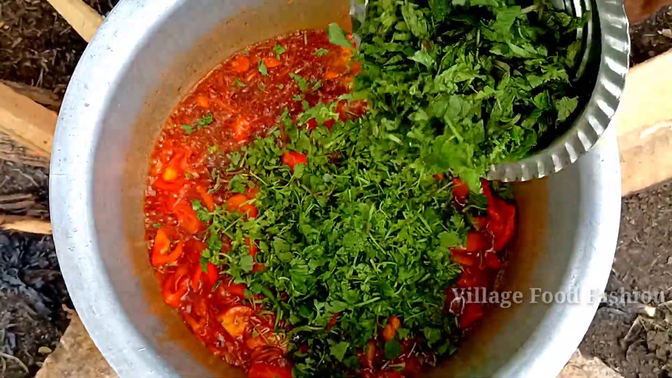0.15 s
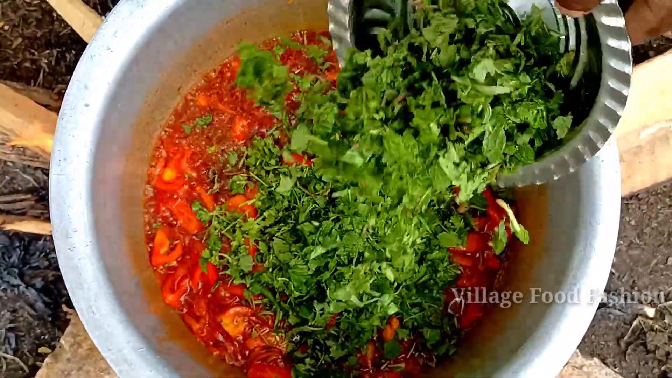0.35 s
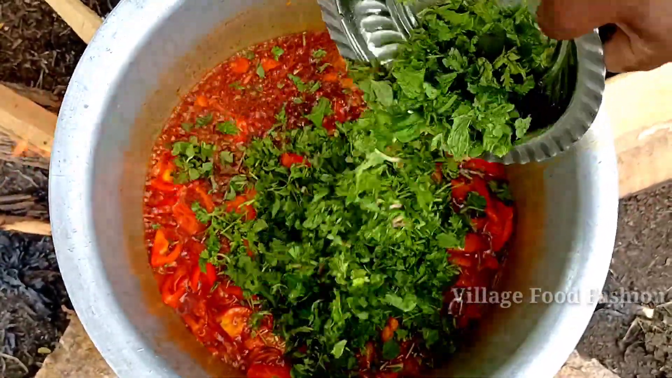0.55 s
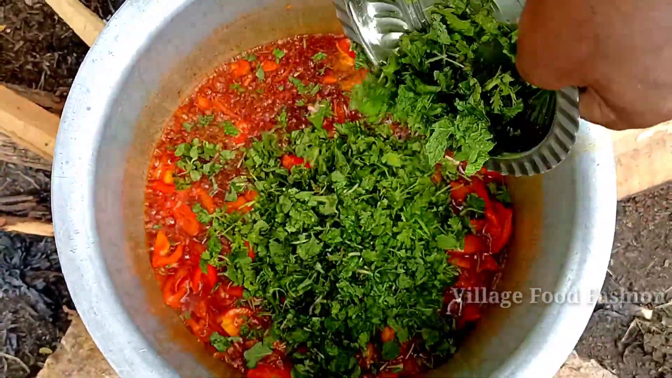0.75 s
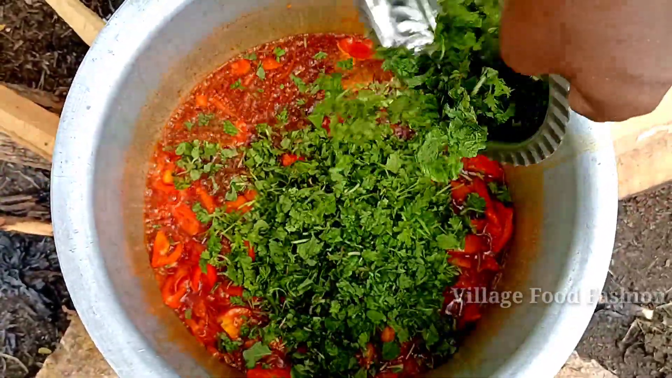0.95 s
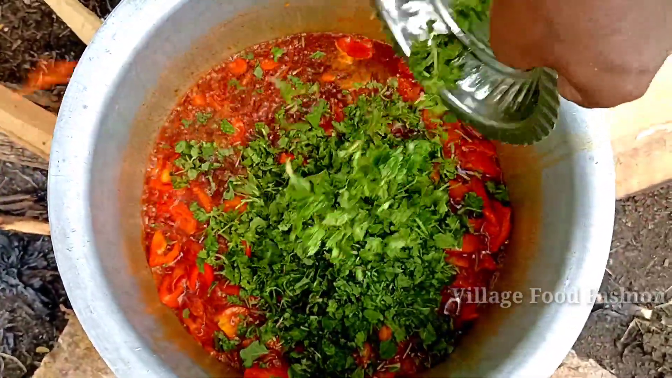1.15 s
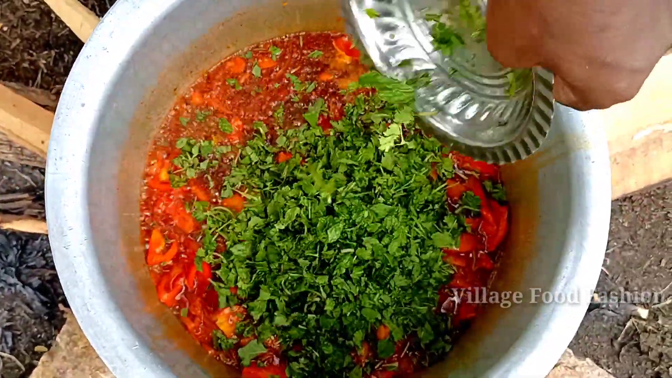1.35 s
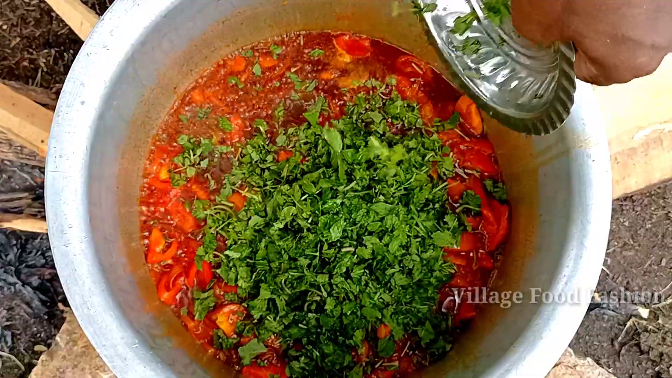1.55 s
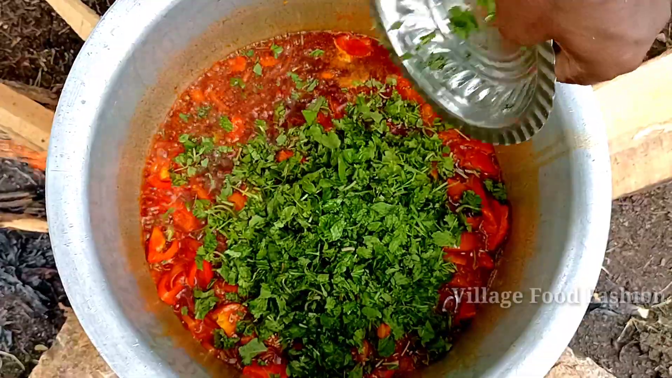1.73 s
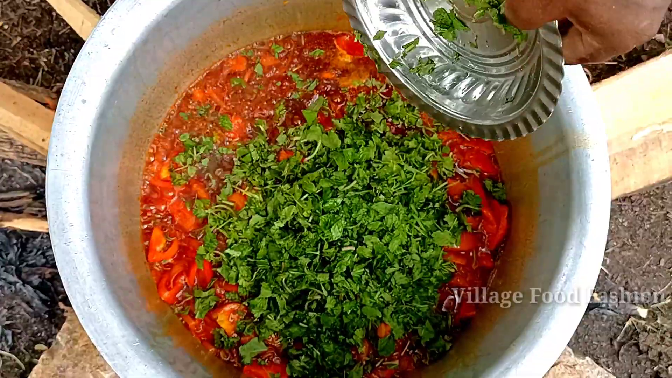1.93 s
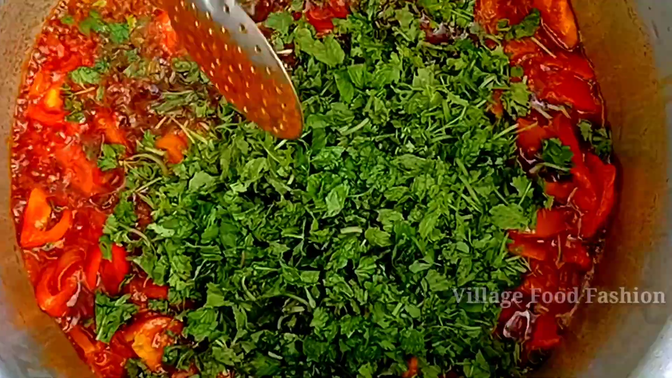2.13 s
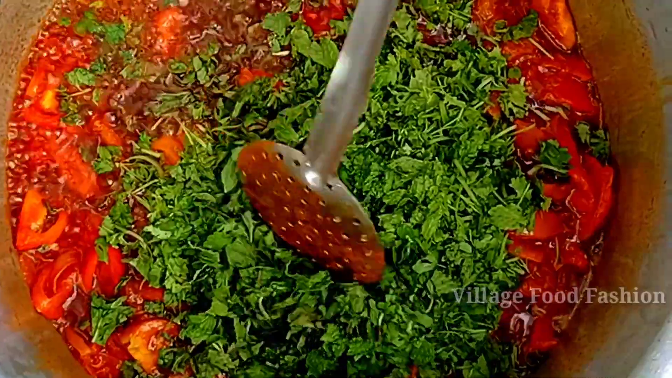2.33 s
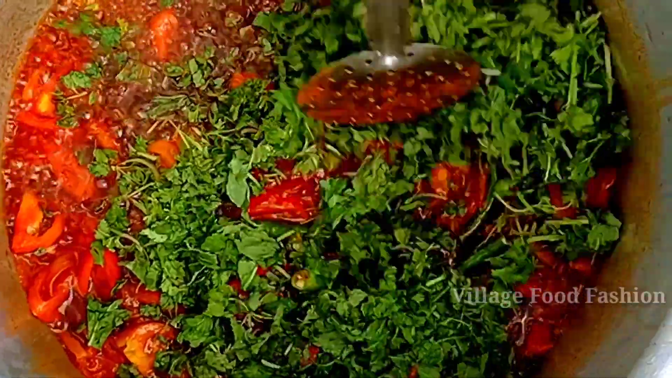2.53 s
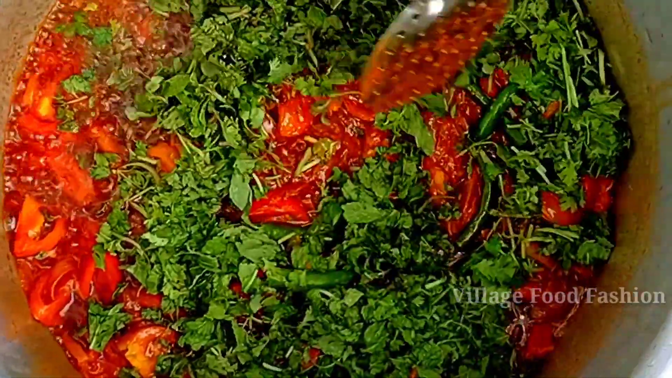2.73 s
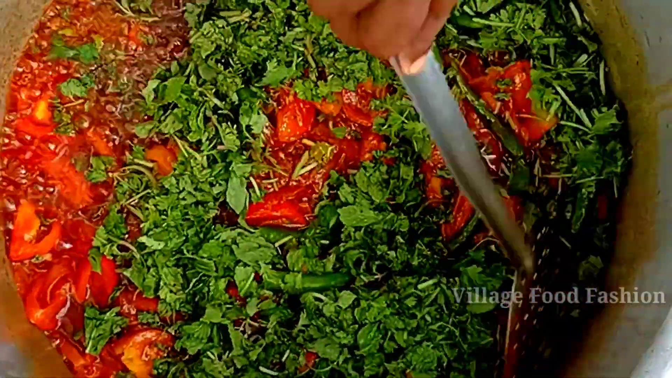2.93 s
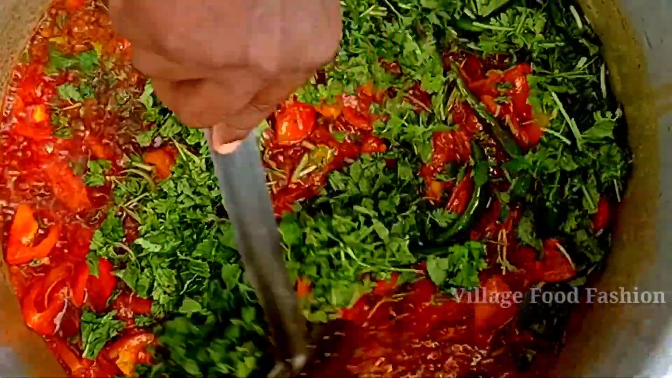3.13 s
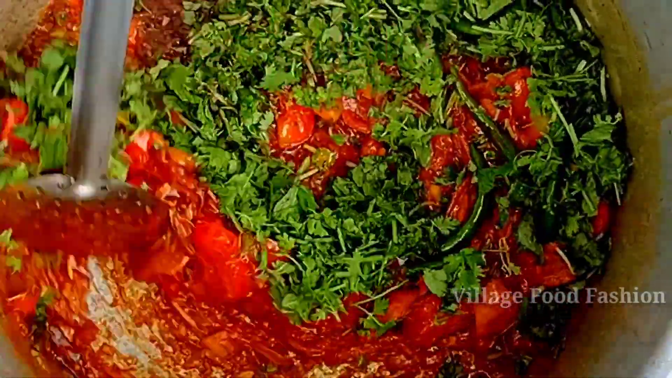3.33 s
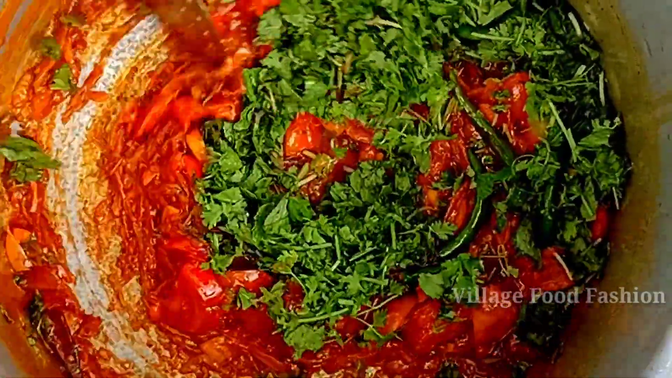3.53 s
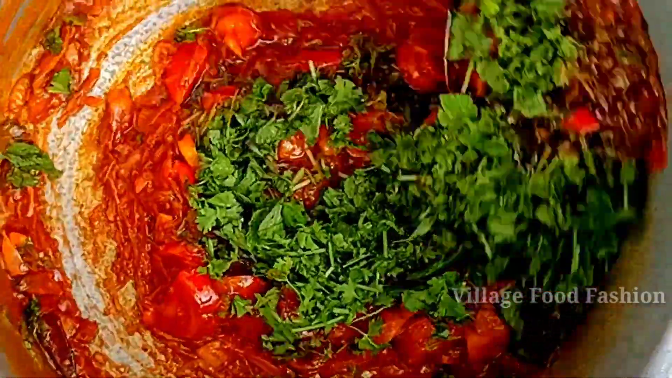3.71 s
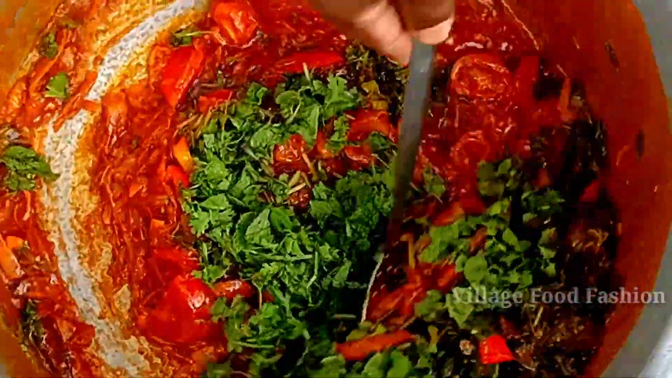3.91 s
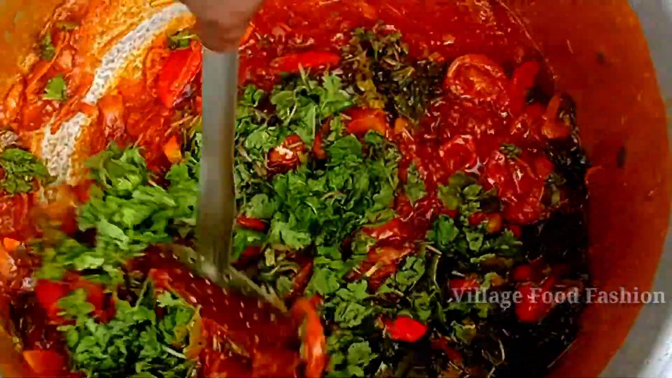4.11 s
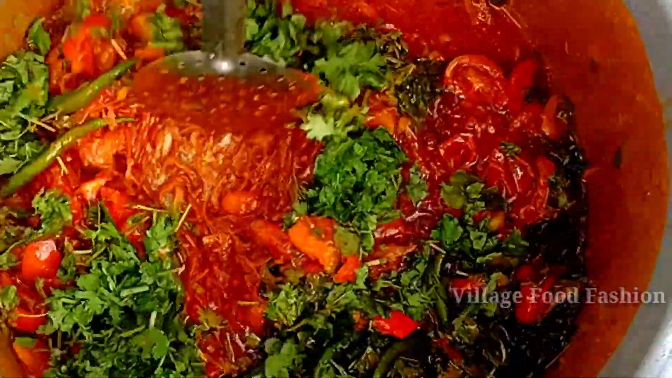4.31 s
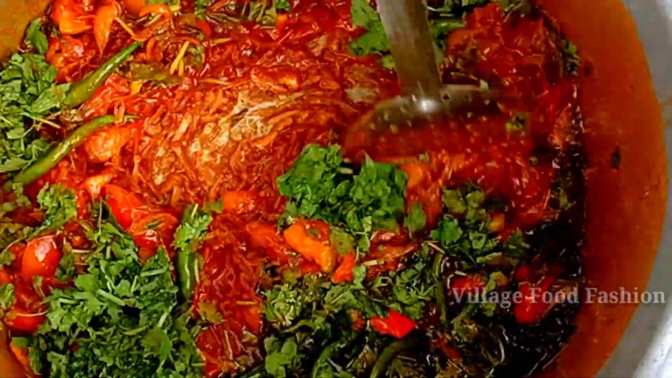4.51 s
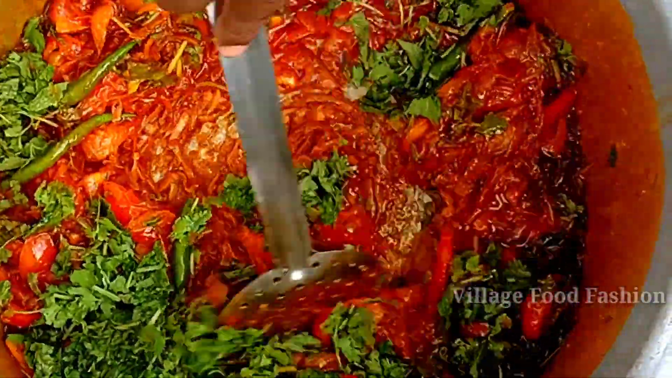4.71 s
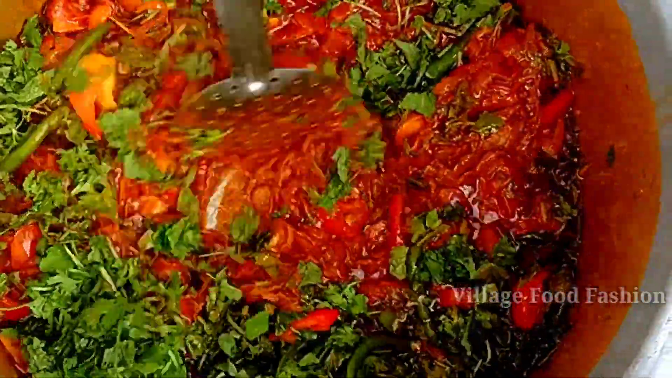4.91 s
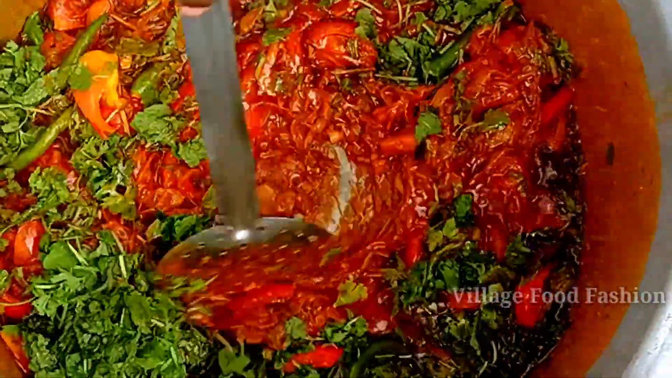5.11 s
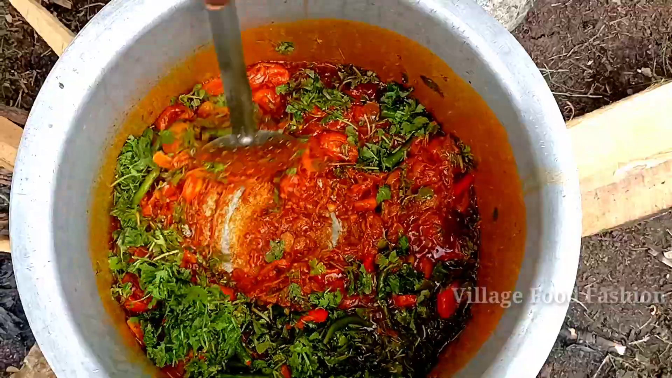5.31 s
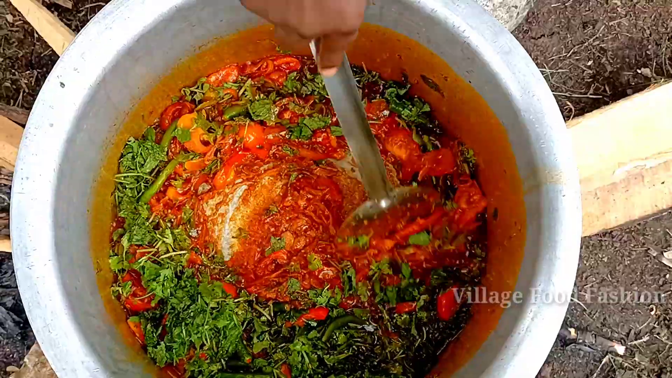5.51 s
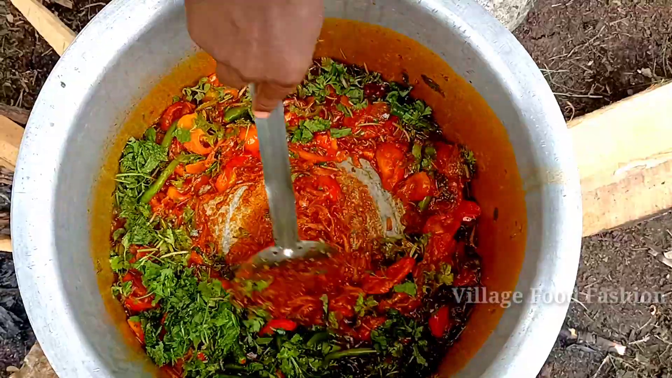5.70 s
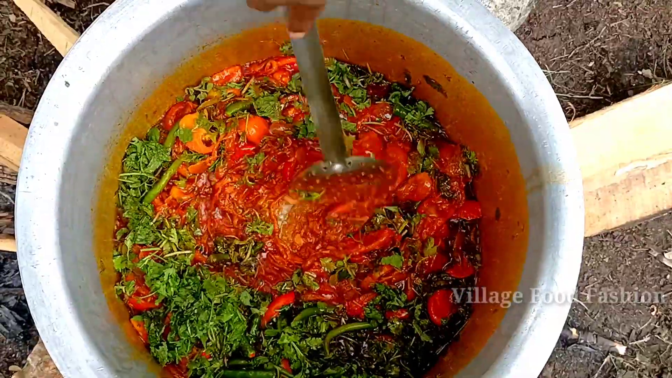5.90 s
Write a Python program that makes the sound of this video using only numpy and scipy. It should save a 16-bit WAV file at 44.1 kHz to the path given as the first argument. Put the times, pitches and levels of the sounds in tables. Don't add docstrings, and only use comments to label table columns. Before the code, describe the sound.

Close stereo from above a large metal pot outdoors. At 0.0 s a short hard knock with a double click and low thump, under a brief gust. Until 3 s a quiet simmer continues: fine uneven crackle, separate bright oil spits, tiny high ticks, faint low air rumble; around 2.2-2.7 s the bubbling livens with a few soft, lower plops. Another gust swells near 3 s. At 3.09 s the ladle strikes the wall with a bright clang, bouncing rapidly and dying quickly. Short scrapes follow, and from 3.4 s the frying opens into a dense hiss, strongest around 3.6 s, easing by 4.3 s while the blade mostly rests. From 4.4 s gritty, ringing scrapes return in quick strokes, with sharp metallic snags and soft hollow booms of falling masala near 4.66, 4.97 and 5.5 s. The sizzle dips near 5.2 s, then rises again; the scraping is loudest from 5.3 s and continues to the end.

```python
import sys
import numpy as np
from scipy import signal
from scipy.fft import rfft, irfft, next_fast_len
from scipy.io import wavfile
from scipy.ndimage import uniform_filter1d, map_coordinates

SR = 44100
rng = np.random.default_rng(int(sys.argv[2]) if len(sys.argv) > 2 else 0)


def gain_from_decibels(decibels):
    exponent = np.asarray(decibels, float) / 20
    return 10 ** exponent


def wav_record(signal):
    frames = np.transpose(np.atleast_2d(signal))
    bounded = np.clip(frames, -1, 1)
    quanta = np.round(bounded * 32767).astype(np.int16)
    wavfile.write(sys.argv[1], SR, quanta)


N = 262395


def unit(x):
    return x / np.sqrt(np.mean(x ** 2) + 1e-20)


def along(points, hz):
    f, v = np.transpose(points)
    return np.interp(np.log(hz + 1), np.log(f + 1), v)


def level_curve(rows, before_db=-120):
    s, db = np.transpose(rows)
    return np.interp(np.arange(N) / SR, s, db, left=before_db)


def wobble(rate):
    knots = rng.standard_normal(int(N * rate / SR) + 4)
    return map_coordinates(knots, [np.arange(N) * rate / SR])


def filtered(x, response):
    m = next_fast_len(N + SR // 2)
    return irfft(rfft(x, m) * response(np.fft.rfftfreq(m, 1 / SR)), m)[..., :N]


def toned(x, tone):
    return unit(filtered(x, lambda hz: gain_from_decibels(along(tone, hz))))


def bursts(rate, spread_db, life, share):
    sizes = np.minimum(rng.exponential(1, N), 3)
    starts = (rng.random(N) < rate / SR) * gain_from_decibels(spread_db * sizes)
    t = np.arange(SR // 20) / SR
    shape = signal.fftconvolve(starts, np.exp(-t / life))[:N]
    share = np.clip(share, 0, 1)
    envelope = np.sqrt(1 - share) + np.sqrt(share) * unit(shape)
    return envelope * rng.standard_normal((2, N))


def pressed(s, held, db, rise, fall):
    t = np.arange(0, N + 64, 64) / SR
    s, held, db = s[:, None], np.abs(held)[:, None], db[:, None]
    before = np.maximum(s - t, 0)
    after = np.maximum(t - s - held, 0)
    return gain_from_decibels(db - rise * before - fall * after)


def contact(s, held, db):
    return pressed(s, held, db, rise=598, fall=302)


def summed(gains, weight=1):
    total = np.sqrt(np.sum((gains * np.reshape(weight, (-1, 1))) ** 2, axis=0))
    return np.interp(np.arange(N) / 64, np.arange(len(total)), total)


def add(track, s, sound):
    part = track[:, round(s * SR):][:, :sound.shape[1]]
    part += sound[:, :part.shape[1]]


def ring(hz, t60, attack, length):
    t = np.arange(int(length * SR)) / SR
    phase = [[0], [rng.uniform(0, 2 * np.pi)]]
    return gain_from_decibels(-60 * t / t60) * (1 - np.exp(-t / attack)) * np.sin(2 * np.pi * hz * t + phase)


def puff(hz, t60):
    t = np.arange(SR // 25) / SR
    b, a = signal.butter(2, [0.72 * hz, min(1.4 * hz, 0.45 * SR)], "band", fs=SR)
    return gain_from_decibels(-60 * t / t60) * unit(signal.lfilter(b, a, rng.standard_normal((2, len(t)))))


def bubble(hz):
    life = 0.0063 + 14 / hz
    tone = 1.12 * ring(hz, life, 0.00021, 0.04)
    spray = 0.6 * puff(hz, 0.84 * life)
    snap = 0.23 * puff(min(1.5 * hz, 7500), 0.0034)
    return tone + spray + snap


def patchy(pair, patchy_db):
    z = signal.stft(pair, nperseg=512)[2]
    field = uniform_filter1d(rng.standard_normal(z.shape[1:]), size=6, axis=0)
    field = uniform_filter1d(field, size=8, axis=1)
    return signal.istft(z * gain_from_decibels(patchy_db * unit(field)), nperseg=512)[1][:, :N]


# (frequency [Hz], density [dB per Hz])
FIZZ_COLOUR = [(9500, -22.5), (11000, -15), (12500, -8), (14200, 1), (15300, -6)]


def oil(level, fizz_db, tone, crackle, fizz, patchy_db):
    body = toned(patchy(crackle, patchy_db), tone)
    top = toned(fizz, FIZZ_COLOUR)
    return gain_from_decibels(2.5) * level * body + gain_from_decibels(fizz_db + 4.5) * top


# (time [s], level [dB])
SIMMER_LEVEL = [
    (0.06, -36.5),
    (0.69, -37),
    (1.69, -36.5),
    (2.24, -39),
    (2.47, -35.5),
    (3.07, -36),
]
# (frequency [Hz], density [dB per Hz])
SIMMER_COLOUR = [(90, -48), (170, -11.5), (295, 3), (450, -16), (680, -9), (990, -7), (1900, -11.5),
                 (2500, -2.5), (3500, -4.5), (5700, -7.5), (8300, -7.5), (9300, -17.5), (10500, -27.5),
                 (13000, -45)]


def simmer():
    calm_db = level_curve(SIMMER_LEVEL, before_db=None)
    crackle = bursts(400, 3.6, 0.002, 0.25)
    fizz = bursts(200, 4.1, 0.00099, 0.27)
    swell = gain_from_decibels(0.26 * wobble(6.76))
    return swell * oil(gain_from_decibels(calm_db + 1.43), calm_db - 7.5, SIMMER_COLOUR, crackle, fizz, patchy_db=2)


# (time [s], level [dB])
GUST_LEVEL = [
    (0.01, -38),
    (1.95, -51),
    (2.42, -49),
    (2.98, -40),
    (3.31, -41.5),
    (5.05, -50.5),
    (5.4, -44),
    (5.78, -45),
]
# (frequency [Hz], density [dB per Hz])
RUMBLE_COLOUR = [(8.8, -40), (15, 9), (70, 3), (107, 0), (220, -6), (290, -37), (480, -120)]


def breeze():
    steady_db, slope = -48, 94
    s, db = np.transpose(GUST_LEVEL)
    gusts = summed(pressed(s, 0 * s, db, slope, slope))
    lumps = np.hypot(gain_from_decibels(steady_db), gusts) * gain_from_decibels(1.0 + 1.1 * wobble(5.71))
    return lumps * toned(rng.standard_normal((2, N)), RUMBLE_COLOUR)


# (time [s], peak level [dB], pitch [Hz], t60 [s])
KNOCKS = [
    (.0247, -1, 278, .04),
    (1.3725, -21, 230, .02),
]
# (time [s], peak level [dB], centre [Hz], t60 [s])
CLICKS = [
    (0.026, -2, 820, 0.0087),
    (0.0259, 1.5, 2080, 0.0099),
    (0.023, -9, 1590, 0.0085),
    (0.0256, -9, 630, 0.014),
    (0.029, -9, 2560, 0.0082),
    (.0335, -3, 2350, 0.01),
    (.0337, 1, 4700, 0.0045),
]


def knocks():
    track = np.zeros((2, N))
    for s, db, hz, t60 in KNOCKS:
        add(track, s, gain_from_decibels(db + 1) * ring(hz, t60, 0.00025, 0.1))
    for s, db, hz, t60 in CLICKS:
        add(track, s, gain_from_decibels(db - 3.5) * puff(hz, t60))
    return track


# (time [s], peak level [dB], pitch [Hz])
OIL_SPITS = [(0.14, -14, 3250), (0.2589, -26, 3630), (0.488, -12, 6450), (0.572, -20, 4130),
             (0.615, -15, 4460), (0.6694, -24, 3430), (0.9284, -13, 3370), (0.9503, -14, 6800),
             (0.9997, -25, 3540), (1.079, -21, 3750), (1.2517, -17, 3060), (1.3983, -25, 3300),
             (1.531, -15, 6400), (1.7425, -18, 5070), (1.8083, -29, 3020), (1.9919, -28, 3410),
             (2.1481, -20, 6400), (2.2942, -24, 3650), (2.3172, -18, 2550), (2.3536, -24, 3640),
             (2.378, -13, 3450), (2.407, -19, 2500), (2.4272, -16, 2650), (2.4794, -20, 6440),
             (2.5015, -16, 6080), (2.5202, -14.5, 2510), (2.5883, -15.5, 2740), (2.62, -14, 3180),
             (2.7025, -18, 2510), (2.9273, -19, 7970)]
# (time [s], peak level [dB], pitch [Hz])
TINY_SPITS = [(0.0608, -17, 14700), (0.202, -7, 14100), (0.2878, -31, 14700), (0.3217, -33, 14100),
              (0.4604, -28, 14700), (0.4978, -21, 14300), (0.5038, -11, 13600), (0.6106, -29, 14100),
              (0.7303, -13, 14700), (0.7457, -13, 14400), (0.8281, -34, 13900), (0.9523, -33, 14200),
              (0.9927, -20, 13900), (1.1394, -31.5, 13400), (1.1578, -16, 13600), (1.3454, -25, 14100),
              (1.7919, -28, 14000), (1.8393, -33, 13200), (1.9924, -6, 13400), (2.2409, -33, 14300),
              (2.5018, -33, 13900), (2.5352, -25, 13900), (2.6679, -15, 14200), (2.7377, -26, 13700),
              (2.8016, -20, 14600), (3.0301, -19, 14100), (3.0575, -15, 14300), (3.0894, -22, 13270),
              (3.1358, -22, 14400), (3.2196, -27, 14000)]
# (time [s], peak level [dB], pitch [Hz])
LARGE_PLOPS = [
    (2.235, -28, 1110),
    (2.317, -30, 1080),
    (2.407, -23, 1150),
    (2.433, -27, 1170),
    (2.628, -20, 1210),
    (2.704, -28, 1240),
]


def pops():
    track = np.zeros((2, N))
    for s, db, hz in OIL_SPITS + TINY_SPITS + LARGE_PLOPS:
        tiny_cut_db = 3.8 * (hz > 11000)
        add(track, s, gain_from_decibels(db - 1.0 - tiny_cut_db) * bubble(hz))
    for when, pitch, size in rng.random((700, 3)):
        add(track, when * 4.0, gain_from_decibels(-46.5 + 16 * size ** 2) * bubble(2200 * 4.2 ** pitch))
    return track


# (time [s], level [dB])
CLANG_BLOWS = [
    (3.0891, 0),
    (3.0942, -9),
    (3.0995, -14),
    (3.1055, -19),
    (3.119, -19),
]
# (frequency [Hz], level [dB], t60 [s])
LADLE_MODES = [(620, -30, 0.56), (674, -25.5, 0.16), (1530, -24, 0.028), (2430, -10.5, 0.034),
               (2530, -10, 0.04), (2953, -3, 0.047), (3015, -13.5, 0.19), (3650, -12, 0.062),
               (4580, -26, 0.021), (6080, -14, .025), (6940, -9.5, 0.016)]


def clang():
    track = np.zeros((2, N))
    for s, db in CLANG_BLOWS:
        for hz, level_db, t60 in LADLE_MODES:
            uneven_db = rng.normal(0, 1.2)
            add(track, s, gain_from_decibels(db + level_db + uneven_db) * ring(hz, t60, 0.00023, 0.4))
        crack = gain_from_decibels(-5) * puff(1770, 0.015) + gain_from_decibels(-3.5) * puff(3370, 0.021)
        crack = crack + gain_from_decibels(-19) * puff(4500, 0.01) + gain_from_decibels(-32) * puff(12000, 0.0069)
        add(track, s, gain_from_decibels(db) * crack)
    return track


def resonances(modes):
    def response(f):
        total = 0
        for k, (centre, width, db) in enumerate(modes):
            damping = 1j * f * width
            total = total + (-1) ** k * gain_from_decibels(db) * damping / (centre ** 2 - f ** 2 + damping)
        return total
    return response


def drifting(x):
    at = np.arange(N) + 0.001342 * SR * wobble(5)
    return np.array([map_coordinates(row, [np.clip(at, 0, N - 1)]) for row in x])


# (frequency [Hz], width [Hz], level [dB])
POT_AIR = [
    [(282.2, 18.4, 4), (385, 148, -9.5)],
    [(306, 20.6, -1), (500, 140, -12.5)],
]
LADLE_BOWL = [
    [(1055, 70, -1), (620, 310, -10.5)],
    [(1150, 79, 0), (1290, 91, -27)],
]
LADLE_RIM = [
    [(1510, 180, 8), (2150, 370, -14)],
    [(1544, 70, -5), (2150, 670, -6)],
]
LADLE_STEM = [
    [(2540, 144, 38), (3500, 150, -34)],
    [(2942, 88, 2.5), (4740, 380, -4.5)],
]
# (time [s], held [s], push [dB], place [0 edge - 1 middle])
WALL_HEAVES = [(3.12, .01, -33, 1), (3.25, 0.085, -40, 0.3), (3.419, 0.0072, -25, 0.24),
               (3.5, 0.087, -44, .3), (3.63, 0.09, -32, 0.45), (3.97, 0.29, -41.5, 0.7),
               (4.25, 0.019, -26, 0.4), (4.38, 0.014, -30.5, 0.6), (4.42, 0.17, -36, 0.46),
               (4.59, 0.03, -20, 0.54), (4.661, 0.006, -15.5, 0.7), (4.7, .03, -22, 0.7),
               (4.783, 0.011, -15, 0), (4.85, 0.13, -28, 0.25), (4.974, 0.01, -21, 0.33),
               (5.03, 0.012, -22, 0.1), (5.1, 0.13, -27, 0.6), (5.27, 0.014, -21, 0.24),
               (5.33, 0.11, -24, 0.45), (5.46, 0.01, -17.5, 0.1), (5.53, 0.012, -20, .7),
               (5.57, .12, -20.5, 0.6), (5.72, 0.035, -23.5, 0.47), (5.8, 0.065, -21, 0.26),
               (5.89, 0.023, -19, 0.2)]
# (time [s], held [s], pressure [dB], lean [0 bowl - 0.5 stem - 1 rim],
# place [0 edge - 1 middle])
BLADE_STROKES = [(3.12, .005, -31, .5, 1), (3.165, 0.028, -23.5, 0.29, 0.12), (3.22, 0.078, -32, 0.37, 0.2),
                 (3.42, 0.011, -16, 0.28, 0.38), (3.46, 0.062, -24.5, 0.32, 0.3), (3.56, .06, -20, .2, 0.4),
                 (3.64, 0.035, -15, 0.26, 0.56), (3.69, 0.023, -22, .05, 0.7), (3.74, .55, -39.5, 0.19, .4),
                 (4.375, 0.019, -18.5, 0.37, .7), (4.42, 0.063, -29, .4, 0.3),
                 (4.59, 0.081, -21, 0.28, 0.67), (4.69, 0.045, -19, 0.22, 0.47),
                 (4.76, 0.11, -28, 0.34, 0.4), (4.9, .03, -21.5, 0.66, .6), (4.97, 0.042, -25.5, 0.28, .55),
                 (5.095, 0.091, -20, 0.26, .7), (5.23, 0.099, -22.5, .15, 0.48),
                 (5.33, 0.065, -15.5, 0.25, 1), (5.42, 0.025, -15.5, .15, 0.6),
                 (5.53, 0.061, -17.5, 0.21, 0.64), (5.599, 0.059, -11.5, 0.26, 0.42),
                 (5.775, 0.065, -18, 0.33, 0.43), (5.87, 0.064, -21.5, 0.24, 0.58)]


def scrape():
    slips = bursts(300, 6.1, 0.0027, 0.34)
    lean_loss_db = 23
    s, held, push_db, place = np.transpose(WALL_HEAVES)
    parts = [(POT_AIR, -3.0, contact(s, held, push_db), place)]
    s, held, db, lean, place = np.transpose(BLADE_STROKES)
    rim_db = -6.5 + 0.35 * (db - db.mean())
    for modes, trim_db, seat, part_db in [(LADLE_BOWL, -2.4, 0, 0), (LADLE_RIM, 6.0, 0.78, rim_db),
                                          (LADLE_STEM, 1.96, 0.5, 0)]:
        gains = contact(s, held, db + part_db - lean_loss_db * np.abs(lean - seat))
        parts.append((modes, trim_db, gains, place))
    sound = 0
    for (edge, middle), trim_db, gains, place in parts:
        at_edge = unit(filtered(slips, resonances(edge)))
        at_middle = unit(filtered(slips, resonances(middle)))
        ringing = drifting(np.vstack([at_edge, at_middle]))
        turn = np.pi / 2 * np.clip(place, 0, 1)
        blend = summed(gains, np.cos(turn)) * ringing[:2] + summed(gains, np.sin(turn)) * ringing[2:]
        sound = sound + gain_from_decibels(trim_db) * blend
    return sound


# (time [s], level [dB])
FRY_HEAT = [
    (3.13, -48),
    (3.14, -44),
    (3.18, -42),
    (3.6, -21),
    (4.32, -28.5),
    (4.39, -26),
    (5.22, -33),
    (5.41, -26),
    (5.95, -27),
]
# (frequency [Hz], density [dB per Hz])
FRY_COLOUR = [(120, -27), (295, -5), (450, -25.5), (700, -21), (1050, -17), (1850, -8.5), (2500, -4),
              (3200, -2), (4700, -2.5), (5500, -0.5), (7800, -1), (9000, -5.5), (10500, -18.5),
              (13000, -43)]


def fry():
    heat_db = level_curve(FRY_HEAT)
    bared_s, opening_s, covered_db = 3.405, 0.014, -7.5
    cover_db = covered_db * np.clip((bared_s - np.arange(N) / SR) / opening_s, 0, 1)
    body = gain_from_decibels(-12 + 0.41 * heat_db + cover_db) * (heat_db > -100)
    s, held, pressure_db = np.transpose(BLADE_STROKES)[:3]
    blade_hiss = gain_from_decibels(-11.5) * summed(contact(s, held, pressure_db))
    crackle = bursts(900, 1.4, 0.0015, 0.097)
    fizz = bursts(600, 3.6, 0.00036, 0.065)
    return oil(np.hypot(body, blade_hiss), heat_db + 2.5, FRY_COLOUR, crackle, fizz, patchy_db=1.0)


# (time [s], peak level [dB], pitch [Hz])
BLADE_CATCHES = [(3.3984, -15.5, 2540), (3.6002, -32, 1020), (4.368, -13, 2900), (4.6388, -9, 1150),
                 (4.9069, -13, 1472), (5.0938, -11.5, 1170), (5.178, -8, 1152), (5.3313, -2, 2580),
                 (5.3739, 1.5, 2967), (5.6022, -4, 2540), (5.831, -8, 2970)]


def catches():
    track = np.zeros((2, N))
    for s, db, hz in BLADE_CATCHES:
        tone = ring(hz, 0.12, 0.0022, 0.15)[:, :SR // 25]
        add(track, s, gain_from_decibels(db - 4.0) * (tone + 0.36 * puff(hz, 0.032)))
    return track


# (time [s], peak level [dB], pitch [Hz])
MASALA_SLAPS = [
    (4.264, -20, 285),
    (4.66, -9, 318),
    (4.783, -18, 312),
    (4.972, -13, 302),
    (5.269, -19, 318),
    (5.458, -11, 326),
    (5.528, -10, 347),
    (5.911, -15, 315),
]


def slaps():
    track = np.zeros((2, N))
    for s, db, hz in MASALA_SLAPS:
        add(track, s, gain_from_decibels(db - 2.5) * ring(hz, 0.06, 0.0025, 0.1))
    return track


# (frequency [Hz], likeness [0-1])
PORT_LIKENESS = [(30, .62), (80, .85), (150, .985), (350, .995), (620, .78), (1000, .92), (2000, .5),
                 (3200, .33), (8000, .3), (12000, .1)]


def scene():
    paths = simmer() + breeze() + knocks() + pops() + clang() + scrape() + fry() + catches() + slaps()

    def shares(hz):
        turn = np.arccos(np.clip(along(PORT_LIKENESS, hz), 0, 1)) / 2
        return np.array([np.cos(turn), np.sin(turn)])
    mid, side = filtered(paths, shares)
    return np.array([mid + side, mid - side])


# (frequency [Hz], left minus right [dB])
PORT_BALANCE = [(600, 0), (1300, -1.5), (2500, -3), (4000, 1), (6300, -2), (8200, 6.5), (10500, 1.5),
                (12000, -12), (14000, -19.5), (15500, -7)]
# (frequency [Hz], phase lead [rad])
LEFT_LEAD = [(0, 0), (500, .12), (950, .5), (1250, .9), (2150, 3.3), (15800, 31)]


def ports(hz):
    left_share = 1 / (1 + gain_from_decibels(-2 * along(PORT_BALANCE, hz)))
    gains = np.sqrt(2 * np.array([left_share, 1 - left_share]))
    lead = np.interp(hz, *np.transpose(LEFT_LEAD)) / 2
    return gains * np.exp(1j * np.array([lead, -lead])) * (hz < 15700)


def low_pass(x):
    return signal.sosfilt(signal.butter(12, 16210, fs=SR, output="sos"), x)


def record(dry):
    x = filtered(dry, ports)
    mix = x / (1 + np.abs(x / 0.95) ** 6) ** (1 / 6)
    return low_pass(mix)


dry = scene()
out = record(dry)
wav_record(out)
```